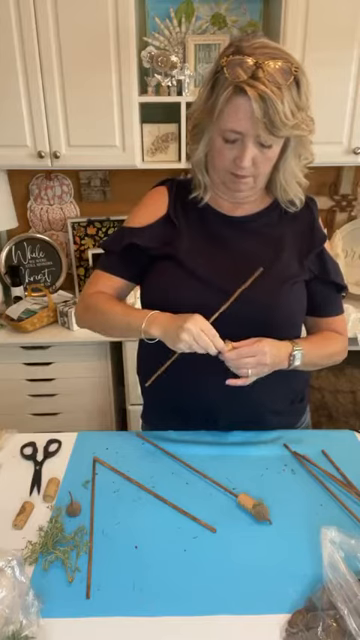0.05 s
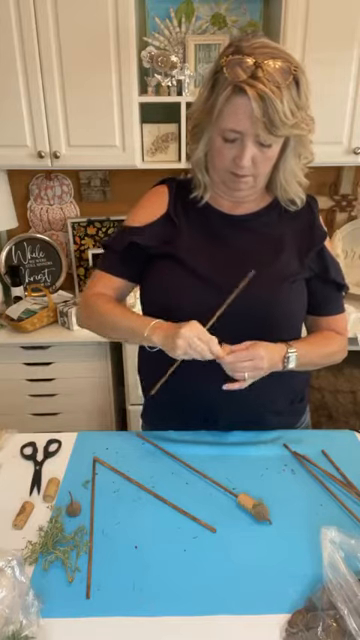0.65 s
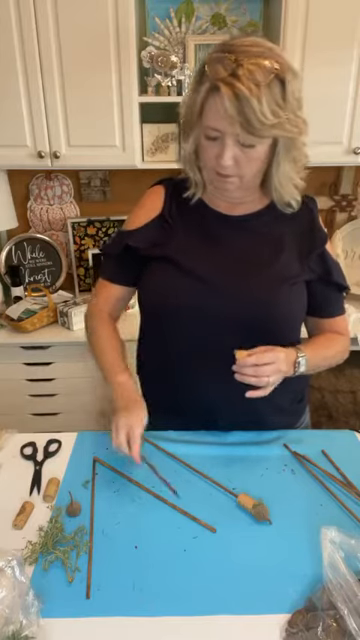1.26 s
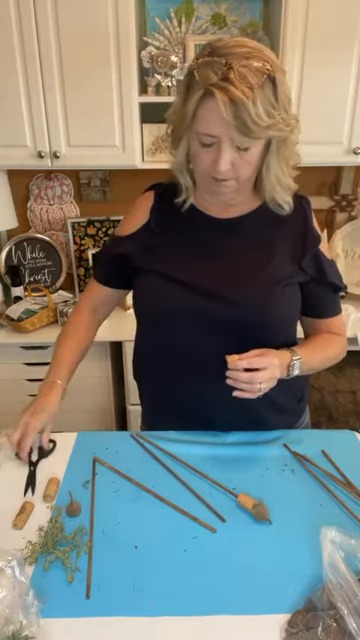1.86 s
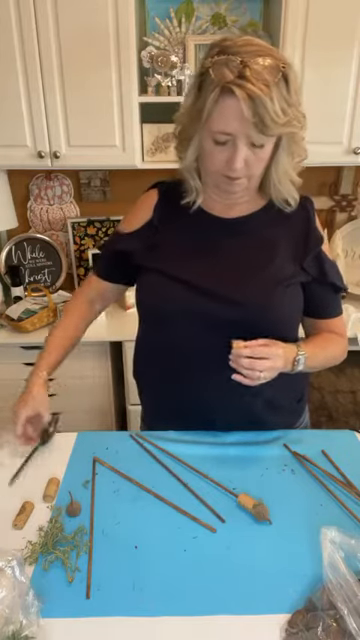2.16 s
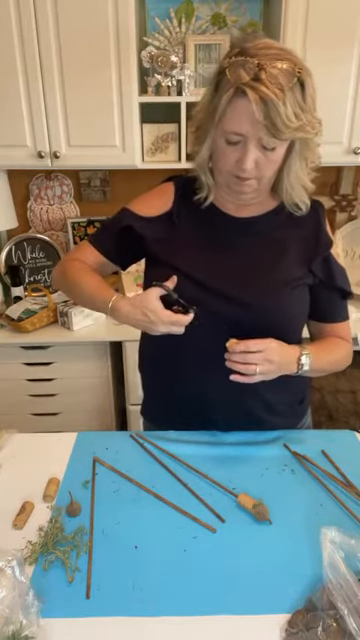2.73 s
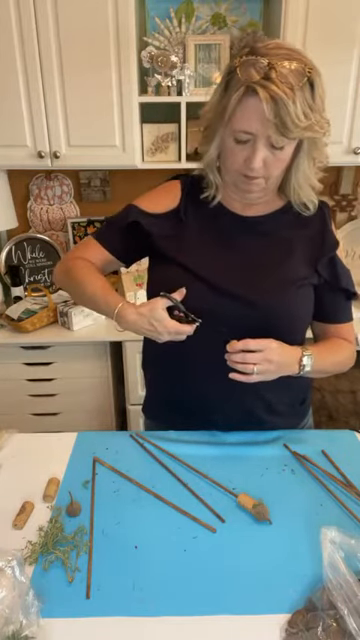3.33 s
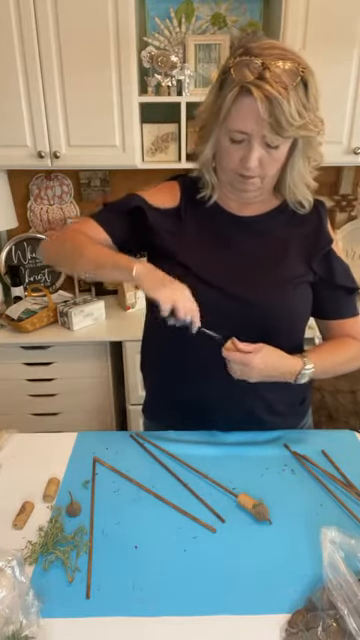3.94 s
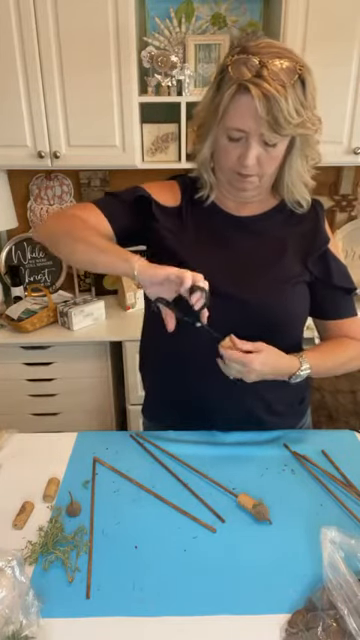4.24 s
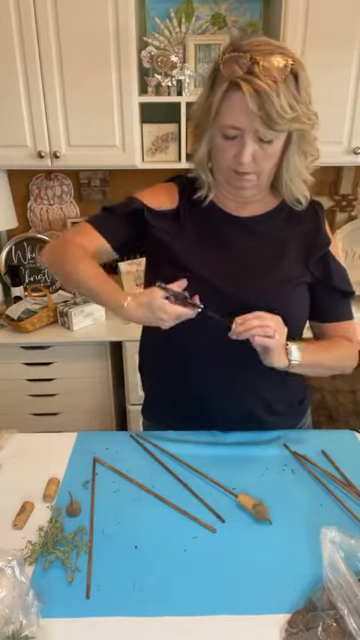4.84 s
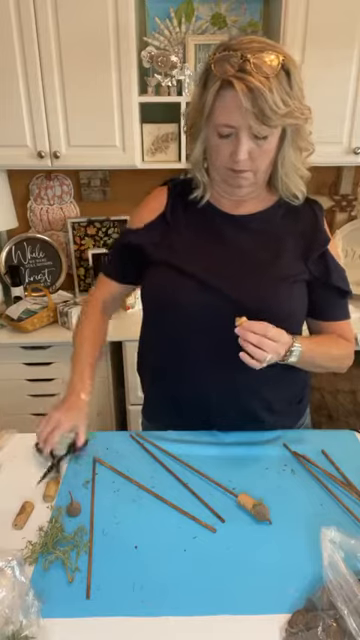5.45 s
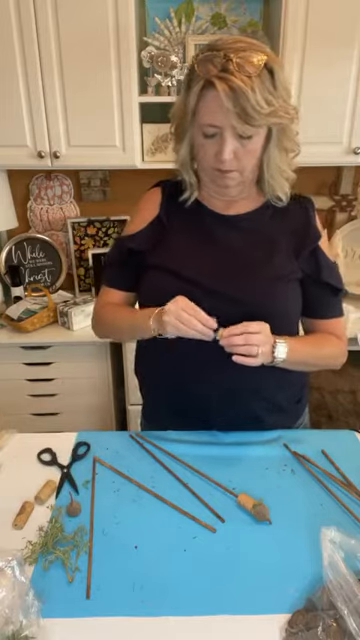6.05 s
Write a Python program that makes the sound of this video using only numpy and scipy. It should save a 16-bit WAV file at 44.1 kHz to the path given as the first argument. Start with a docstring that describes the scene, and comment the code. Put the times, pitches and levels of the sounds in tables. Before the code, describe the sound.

Over soft ventilation hum, faint cork ticks, a stick dropping, scissors snapping shut and clattering down, then a rebounding knock on a table.

```python
"""Faint ticks of a thin wooden stick being tried in a cork, over the soft hum of ventilation.
The stick slides with a thin squeak and drops on the table. Scissors are picked up, snap shut and are
twisted into the cork, then clatter down and rock to rest; a heavy knock rebounds on the table.
Each impact is a noise crack plus ringing modes, and the table top thumps under the harder ones.
All is heard from about a metre away in a small, hard-walled room."""
import sys
import numpy as np
from scipy import signal
from scipy.fft import rfft, irfft
from scipy.io import wavfile
from scipy.ndimage import uniform_filter1d

SR = 44100
rng = np.random.default_rng(int(sys.argv[2]) if len(sys.argv) > 2 else 0)


def master(y):
    """Save y as 16-bit WAV."""
    cut = np.clip(np.atleast_2d(y).T, -1, 1)
    pcm = np.round(cut * 32767)  # scale
    wavfile.write(sys.argv[1], SR, pcm.astype(np.int16))


N = 268348

# stick and scissor tip catch in the cork: (time [s], level [dB], treble [dB], ping [Hz])
CORK_CATCHES = [(.172, -60.5, -8.5, 3480), (.548, -52.5, 11.5, 3450), (.753, -63, -8, 5000),
                (3.291, -62.5, -2.5, 4400), (3.9153, -68.5, 10, 7200), (4.33, -72, -2, 6300),
                (4.524, -70, 4, 4400), (5.129, -65.5, 0.5, 7000)]


def undb(db):
    """Decibels to gain."""
    return 10 ** (np.asarray(db) / 20)


def unit(x):
    """Scale to an energy of one."""
    return x / np.sqrt(np.sum(x ** 2))


def burst(db):
    """Gain that gives a hit the energy of ten milliseconds at this level."""
    return undb(db) * np.sqrt(SR / 100)


def along(points, hz):
    """Read a (frequency, value) curve on a log-frequency axis."""
    f, value = np.transpose(points)
    return np.interp(np.log(hz + 1), np.log(f), value)


def add(out, s, x):
    """Mix x into out from time s."""
    i = max(int(s * SR), 0)
    out[i:i + len(x)] += x[:max(N - i, 0)]


def bins(size):
    """Frequencies of a spectrum of this many samples."""
    return np.fft.rfftfreq(size, 1 / SR)


def equalise(x, db):
    """Minimum-phase EQ in dB per bin, so nothing rings ahead of an attack."""
    cepstrum = irfft(db * np.log(10) / 20, len(x))
    cepstrum[1:len(x) // 2] *= 2
    cepstrum[len(x) // 2 + 1:] = 0
    return irfft(rfft(x) * np.exp(rfft(cepstrum)), len(x))


def shelves(hz, bass_db, treble_db, bass_hz=380, treble_hz=2900):
    """Shelving curve in dB: a heavy contact adds bass, a hard one adds treble."""
    return bass_db / (1 + (hz / bass_hz) ** 2) + treble_db / (1 + (treble_hz / (hz + 1)) ** 4)


def flatten(x, width_hz):
    """Level out the broad humps of a noise burst and keep its fine grain."""
    power = uniform_filter1d(abs(rfft(x)) ** 2, max(int(width_hz * len(x) / SR), 1))
    return unit(equalise(x, -10 * np.log10(np.maximum(power, power.max() * 1e-6))))


def ring(modes, t):
    """Decaying sines, each with the energy of its level; neighbours swing in opposite directions."""
    return sum((-1) ** k * undb(db) * unit(np.sin(2 * np.pi * hz * t) * 1000 ** (-t / t60))
               for k, (hz, db, t60) in enumerate(modes))


def dense_modes(t60s, stretch, attack, size):
    """Noise whose bands die in stretch times their T60; attack is the share of that spent fading in."""
    t, log_hz = np.arange(size) / SR, np.log(bins(size) + 1)
    noise, out = rfft(rng.standard_normal(size)), 0
    centres = np.geomspace(60, 16000, 12)
    for centre, share in zip(centres, np.eye(len(centres))):
        band = irfft(noise * np.interp(log_hz, np.log(centres), share), size)
        age = t / (stretch * along(t60s, centre))
        out = out + band * 1000 ** -age * np.minimum(age / attack, 1)
    return out


def with_send(x, send_db):
    """Pair the direct sound with its send to the room."""
    return np.array([x, x * undb(send_db)])


def impacts(hits, body_eq, modes, stretch, attack, send_db, size=16384):
    """Each hit is a short crack of dense modes plus the ring of the struck body."""
    # decay of the crack before stretching: (frequency [Hz], T60 [s])
    crack_decay = [(120, 0.13), (450, 0.019), (1500, 0.018), (4000, 0.0096), (12000, 0.032)]
    out, t, hz = np.zeros(N), np.arange(size) / SR, bins(size)
    for s, db, bass_db, treble_db in hits:
        crack = flatten(dense_modes(crack_decay, stretch, attack, size), width_hz=223)
        body = unit(equalise(crack, along(body_eq, hz))) + ring(modes, t)
        add(out, s, unit(equalise(body, shelves(hz, bass_db, treble_db))) * burst(db))
    return with_send(out, send_db)


def thumps(hits, hz, gain_db, t60_s, send_db, lag_s=.0012, bass_push=.3):
    """The table top flexes under each hit: a low damped swing, its pitch set by the spot."""
    out, t = np.zeros(N), np.arange(SR // 2) / SR
    swing = ring([(hz, gain_db, t60_s)], t)
    for s, db, bass_db, _ in hits:
        add(out, s + lag_s, swing * burst(db + bass_push * bass_db))
    return with_send(out, send_db)


def bounces(start_s, gap_s, first_db, step_db, count, restitution=.685):
    """Hits that come ever sooner and weaker; first_db and step_db are (level, bass, treble)."""
    k = np.arange(count)
    times = start_s + np.append(0, np.cumsum(gap_s * restitution ** k[:-1]))
    return np.column_stack([times, np.array(first_db) + np.outer(k, step_db)]).tolist()


def ventilation(level_db=-61):
    """A steady bed of air noise, humming at the resonances of the duct."""
    # spectrum of the moving air: (frequency [Hz], relative level [dB])
    air_eq = [(15, -60), (25, -35), (70, -8), (166, -5), (195, -9), (223, -7), (326, -5), (354, -6),
              (427, -7), (516, -5.5), (840, -8), (1230, -16.5), (2480, -21), (3080, -24.5), (16000, -55.5)]
    # duct resonances: (frequency [Hz], width [Hz], boost [dB])
    duct_peaks = [(120.7, 5, 6), (162.1, 7.7, 7), (359.6, 10.9, 13), (521.2, 14.6, 10.5), (616, 22, 7),
                  (1215, 330, 8.5), (2384, 300, 5.5)]
    hz = bins(N)
    hum_db = sum(db / (1 + (2 * (hz - centre) / width) ** 2) for centre, width, db in duct_peaks)
    air = equalise(rng.standard_normal(N), along(air_eq, hz) + hum_db)
    return unit(air) * np.sqrt(N) * undb(level_db)


def hiss_and_slides(grain_db=5, flutter_db=2.5, hiss_lead_s=.008):
    """Faint hiss and soft sliding sounds: swells of noise whose tiny, uneven grains come in bunches."""
    # a very faint swell of high hiss, then soft sliding sounds:
    # (centre [s], half length [s], level [dB], treble [dB])
    swells = [(.958, .05, -86, 8), (1.058, 0.023, -67, 24), (1.313, 0.037, -73.5, 8),
              (1.409, 0.067, -74, -10), (1.93, 0.033, -57.5, -19), (2.198, 0.018, -54, 2),
              (2.478, 0.06, -79, 0)]
    # tone of the hiss: (frequency [Hz], gain [dB])
    hiss_eq = [(500, -18.5), (2500, -2.5), (4800, 1.5), (7500, 2), (9000, -0.5), (11000, -2), (16000, -1.5)]
    # a faint, brief hiss surrounds each tick; columns as in swells
    tick_hiss = [(s - hiss_lead_s, .044, -82.5, -6) for s, *_ in CORK_CATCHES]
    out, t, hz = np.zeros(N), np.arange(SR) / SR - .5, bins(SR)
    for s, half_s, db, treble_db in swells + tick_hiss:
        flutter = np.interp(t, np.linspace(-.5, .5, 300), rng.standard_normal(300))
        texture_db = grain_db * np.minimum(rng.exponential(size=SR), 5) + flutter_db * flutter
        grains = rng.standard_normal(SR) * undb(texture_db)
        hiss = unit(equalise(grains, along(hiss_eq, hz) + shelves(hz, 0, treble_db))) * np.sqrt(SR)
        add(out, s - .5, hiss * undb(db) * np.exp(-(t / half_s) ** 2))
    return with_send(out, send_db=-2)


def cork_ticks(bass_db=-1.5, ping_db=-9.5, ping_t60_s=.0035):
    """A tip catches in the cork: tiny dry cracks, each with its own brief ping."""
    # tone of the cork: (frequency [Hz], gain [dB])
    cork_eq = [(150, -55), (450, 21), (1700, 3), (2600, 1.5), (3600, 0), (4400, -4), (7000, -1.5),
               (10000, -11), (16000, -6.5)]
    return sum(impacts([(s, db, bass_db, treble_db)], cork_eq, [(hz, ping_db, ping_t60_s)],
                       stretch=.83, attack=.06, send_db=-2)
               for s, db, treble_db, hz in CORK_CATCHES)


def stick_squeak(start_s=1.36, release_s=1.535, hz=4770, width_hz=160, level_db=-75):
    """The tip slides over the mat: uneven friction drives one mode, swelling until the stick is let go."""
    t = np.arange(N) / SR
    lowpass = signal.butter(2, width_hz / 2, fs=SR, output="sos")
    grip = unit(signal.sosfilt(lowpass, rng.standard_normal(N))) * np.sqrt(N)
    swell = np.interp(t, [start_s, release_s], [0, 1], right=0)
    return with_send(grip * swell * undb(level_db) * np.sin(2 * np.pi * hz * t), send_db=0)


def stick_drop():
    """The stick lands on one end, then the other, and bounces once."""
    # landings: (time [s], level [dB], bass [dB], treble [dB])
    hits = [(1.5382, -30.5, -1.5, -2.5), (1.5482, -39.5, 0, 1.5), (1.641, -47, -7, -4),
            (1.6442, -36, -12.5, -17)]
    # tone of the wood: (frequency [Hz], gain [dB])
    wood_eq = [(60, -28), (110, -3), (165, 8.5), (210, 5.5), (280, 2.5), (700, -1.5), (1050, -0.5),
               (1800, -2), (2300, -8.5), (2850, -4), (3400, -10.5), (7500, -8.5), (9000, -15),
               (13000, -12.5), (16000, -28)]
    # ring of the stick: (frequency [Hz], level [dB], T60 [s])
    modes = [(1040, -10, 0.034), (1660, -23, .07), (2860, -13, 0.034), (3978, -19.5, .07),
             (5254, -17, .035), (6650, -15, 0.071), (8020, -16.5, 0.037)]
    clack = impacts(hits, wood_eq, modes, stretch=.86, attack=.052, send_db=-3)
    return clack + thumps(hits, hz=156.7, gain_db=-6.5, t60_s=.11, send_db=-5.5)


def scissor_grab(ring_hz=876, ring_db=-23.5, ring_t60_s=.27):
    """Fingers grab the scissors and bump their handles on the table; once a hand lands heavily on it."""
    # bumps of the handles, the second row a hand landing on the table: (time [s], level [dB], bass [dB], treble
    # [dB])
    hits = [(1.781, -45, 15.5, -7), (1.8605, -45, 23.5, 12), (1.936, -42, 0, -18),
            (2.0075, -40.7, -9, -7.5), (2.0324, -32, -8, -2), (2.046, -40, 2.5, -2)]
    # tone of the handles on the table: (frequency [Hz], gain [dB])
    handle_eq = [(60, -30), (130, 0.5), (220, -4.5), (400, 2.5), (620, -3), (900, -1), (1300, -0.5),
                 (1700, -5.5), (2000, -9.5), (2400, -10.5), (3200, -19), (5200, -19), (10000, -33),
                 (16000, -46)]
    bumps = impacts(hits, handle_eq, [(ring_hz, ring_db, ring_t60_s)], stretch=1.2, attack=.03, send_db=.5)
    return bumps + thumps(hits, hz=402, gain_db=-7, t60_s=.12, send_db=-6.5)


def blade_snap():
    """The blades snap together with a bright double click."""
    # blade contacts: (time [s], level [dB], bass [dB], treble [dB])
    hits = [(2.1475, -35, 5.5, 1), (2.156, -46.5, 7, -4)]
    # tone of the click: (frequency [Hz], gain [dB])
    blade_eq = [(70, -21), (200, 0), (800, -3), (1900, -4.5), (2800, -3.5), (3500, 0.5), (5000, 1.5),
                (6200, -9), (7200, -5), (9000, -15.5), (16000, -28)]
    # ring of the blades: (frequency [Hz], level [dB], T60 [s])
    modes = [(2790, -21, .06), (3177, -9, .07), (3240, -13, .06), (4130, -15, 0.06), (5070, -18, 0.014)]
    return impacts(hits, blade_eq, modes, stretch=.51, attack=.058, send_db=-3)


def blade_chatter(count=4, fade_db=-4.5, scatter_db=1):
    """The loose blades touch at chance moments, fading over each spell; gives rows of hits."""
    # spells after the drop and the knock: (start [s], end [s], level [dB], bass [dB], treble [dB])
    spells = [(5.61, 5.68, -37, -15, -1), (5.931, 6.04, -38, -15, -12)]
    hits = []
    for start, end, db, bass_db, treble_db in spells:
        for k in range(count):
            progress = (k + rng.random()) / count
            touch_db = db + fade_db * progress + scatter_db * rng.standard_normal()
            hits.append((start + progress * (end - start), touch_db, bass_db, treble_db))
    return hits


def scissor_drop():
    """The scissors land handles first, then blades, fall back once, chatter and rock to rest."""
    # landings: (time [s], level [dB], bass [dB], treble [dB])
    landings = [(5.5846, -35, 3, 3), (5.586, -25, 8.5, -22), (5.5934, -23, -6, 6.5),
                (5.5952, -25, -9.5, -4), (5.6955, -34.5, 5, -12), (5.701, -30.5, -2, -8)]
    # tone of the clatter: (frequency [Hz], gain [dB])
    scissor_eq = [(55, -41), (95, -5.5), (150, 1), (210, 3), (280, 1.5), (430, 4.5), (580, -3), (800, -1),
                  (1050, -5.5), (1400, 3), (2000, -6.5), (2600, -3.5), (3400, -15), (5200, -17.5),
                  (7500, -29), (10000, -40.5), (16000, -51)]
    # ring of the scissors: (frequency [Hz], level [dB], T60 [s])
    modes = [(429, -16.5, 0.09), (1230, -32, 0.23), (1444, -16.5, 0.09), (2500, -29, .14),
             (2636, -26, 0.096), (2750, -23, .1), (4070, -29, 0.11), (4900, -50, 0.11)]
    rocking = bounces(start_s=5.7518, gap_s=.0488, first_db=(-33.5, -1.5, 2),
                      step_db=(-5.5, -7, -4.5), count=4)
    hits = landings + rocking + blade_chatter()
    clatter = impacts(hits, scissor_eq, modes, stretch=.85, attack=.043, send_db=-2)
    return clatter + thumps(landings, hz=197, gain_db=-5, t60_s=.092, send_db=-11)


def table_knock():
    """A heavy knock on the table top, followed by three duller rebounds."""
    # the knock: (time [s], level [dB], bass [dB], treble [dB])
    first_hit = [(5.9153, -19.9, 0, 5.1)]
    # tone of the table top: (frequency [Hz], gain [dB])
    table_eq = [(55, -33), (95, -12), (200, -3), (280, -5), (460, 2), (700, -10), (1100, -10.5),
                (1800, -12), (2800, -21.5), (3900, -35.5), (6000, -36.5), (8000, -50), (16000, -67)]
    # ring of the table top: (frequency [Hz], level [dB], T60 [s])
    modes = [(514, -10, 0.066), (593, -14.5, 0.1), (710, -18, .06), (1890, -15, 0.033)]
    hits = first_hit + bounces(start_s=6, gap_s=.033, first_db=(-28.5, 1.5, -11),
                               step_db=(-2, -1.5, 4.5), count=3)
    knocks = impacts(hits, table_eq, modes, stretch=.99, attack=.064, send_db=-2)
    return knocks + thumps(hits, hz=492, gain_db=-3, t60_s=.033, send_db=-10.5)


def room(send, predelay_s=.0015, build_s=.0046, low_shelf_db=-7, shelf_hz=800):
    """Cupboards and walls answer within milliseconds: single standing waves below, a dense wash above."""
    # decay of the wash before stretching: (frequency [Hz], T60 [s])
    wash_decay = [(100, 0.26), (300, 0.27), (1000, 0.59), (2500, 0.31), (5000, 0.57), (9000, 0.37),
                  (15000, 0.12)]
    # standing waves: (frequency [Hz], level [dB], T60 [s])
    standing_waves = [(121.6, -29.5, 0.49), (148.2, -30, 0.33), (186.5, -35.5, 0.45), (208.9, -26.5, 0.57),
                      (229, -35, 0.15), (307, -24, 0.61), (373, -28, 0.91), (391.7, -28.5, 0.4),
                      (406, -32, 0.32), (428.7, -32, .8), (480, -26, .45), (506, -38, 0.99),
                      (568, -28.5, 0.44), (622, -28, 0.38), (662, -35, 0.54), (689.5, -23.5, 0.34),
                      (725.5, -28.5, 0.5), (772, -25, 0.7), (797, -28, 0.43), (882, -26.5, 0.6)]
    t = np.arange(SR) / SR
    wash = flatten(dense_modes(wash_decay, stretch=.93, attack=.0038, size=SR), width_hz=43)
    wash = equalise(wash, low_shelf_db / (1 + (bins(SR) / shelf_hz) ** 4))
    tail = (wash + ring(standing_waves, t)) * np.clip((t - predelay_s) / build_s, 0, 1)
    return signal.fftconvolve(send, unit(tail))[:N]


def scene(low_cut_hz=91):
    """Handling sounds and their reverb over the ventilation bed."""
    direct, send = (hiss_and_slides() + cork_ticks() + stick_squeak() + stick_drop()
                    + scissor_grab() + blade_snap() + scissor_drop() + table_knock())
    # a steep low cut leaves the handling sounds without deep bass
    low_cut = signal.butter(5, low_cut_hz, "high", fs=SR, output="sos")
    handling = signal.sosfilt(low_cut, direct + room(send))
    return (handling + ventilation())[None]


def record(dry, hiss_db=-92, high_cut_hz=15950):
    """A trace of microphone hiss, then a steep high cut."""
    hiss = rng.standard_normal(dry.shape) * undb(hiss_db)
    return signal.sosfilt(signal.ellip(10, .2, 70, high_cut_hz, fs=SR, output="sos"), dry + hiss)


dry = scene()
out = record(dry)
master(out)
```